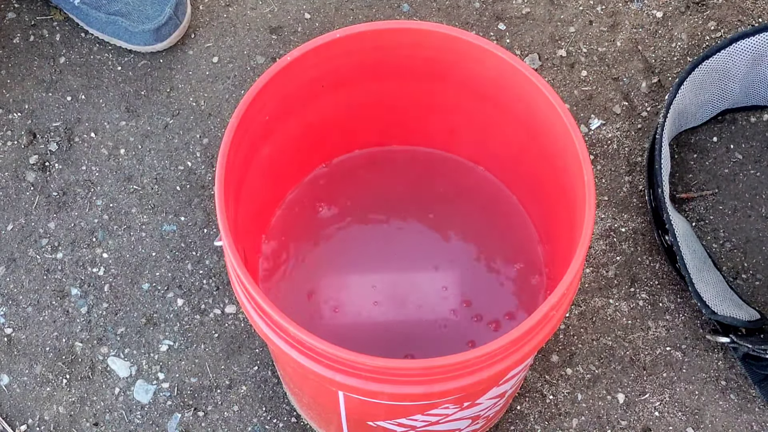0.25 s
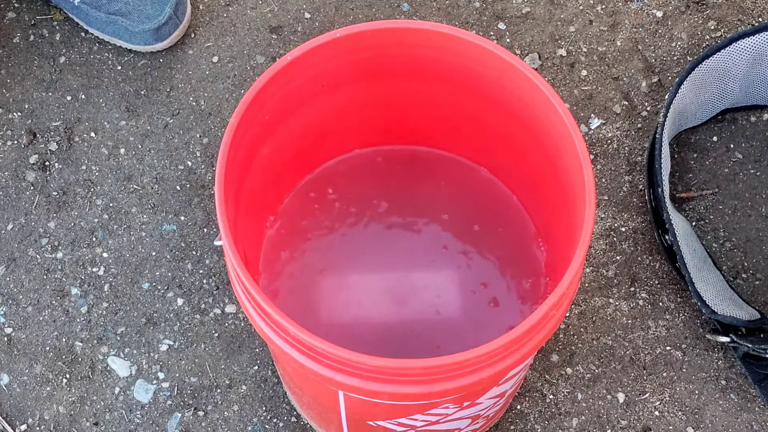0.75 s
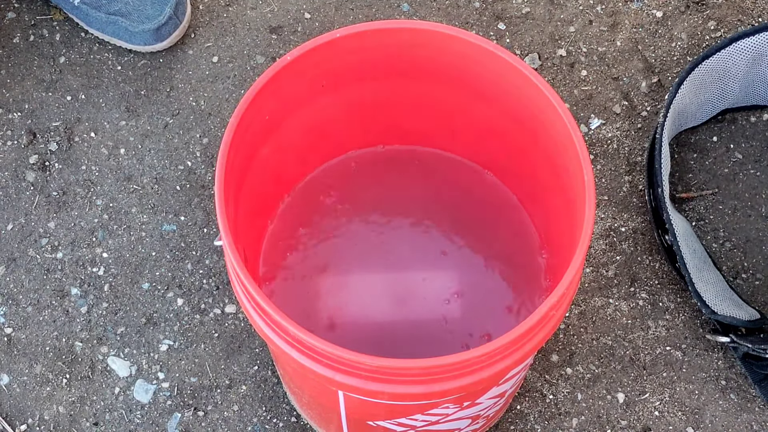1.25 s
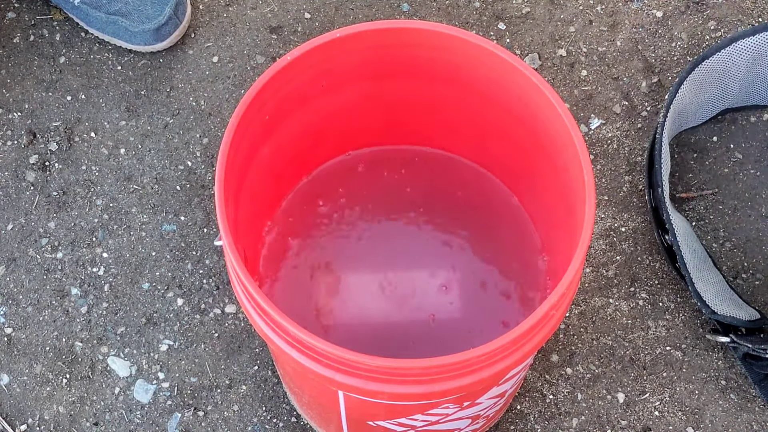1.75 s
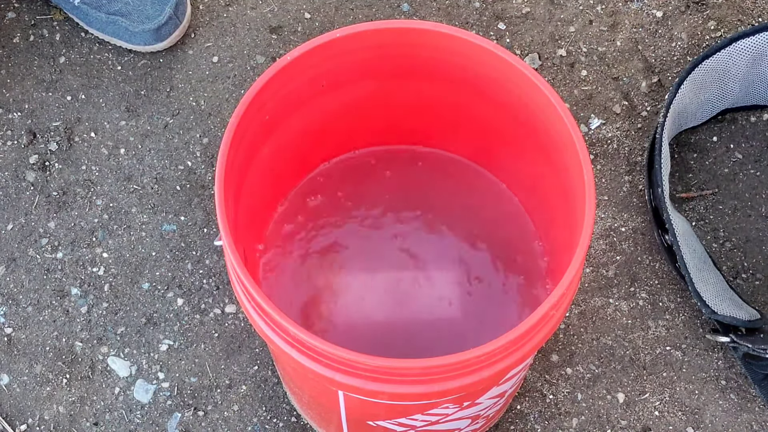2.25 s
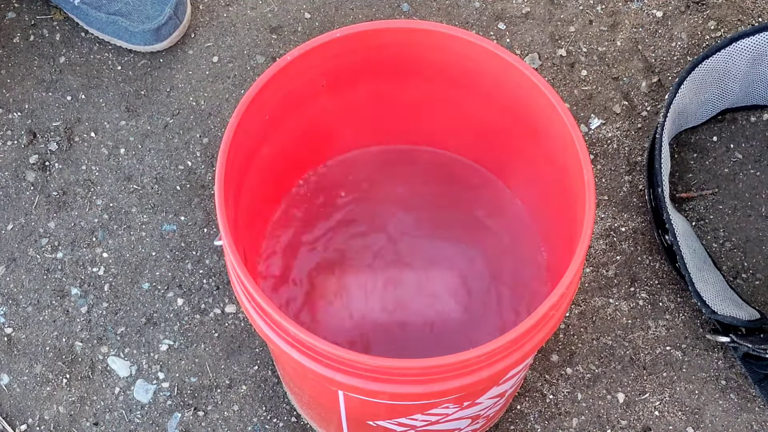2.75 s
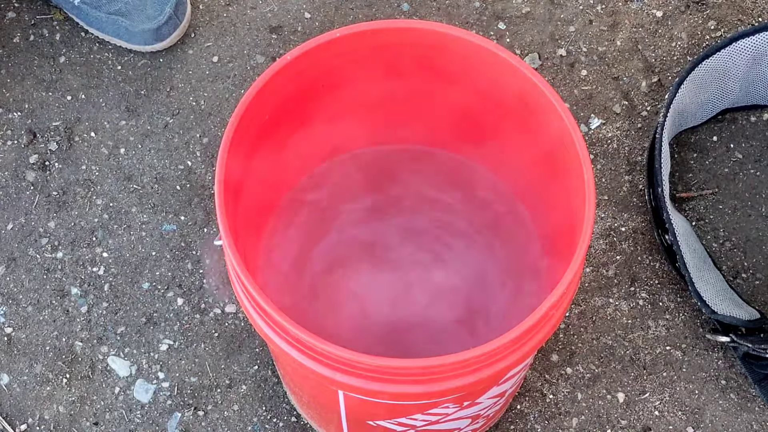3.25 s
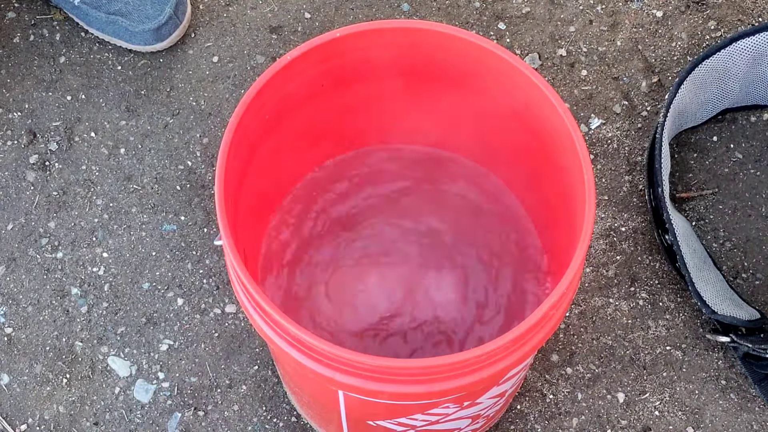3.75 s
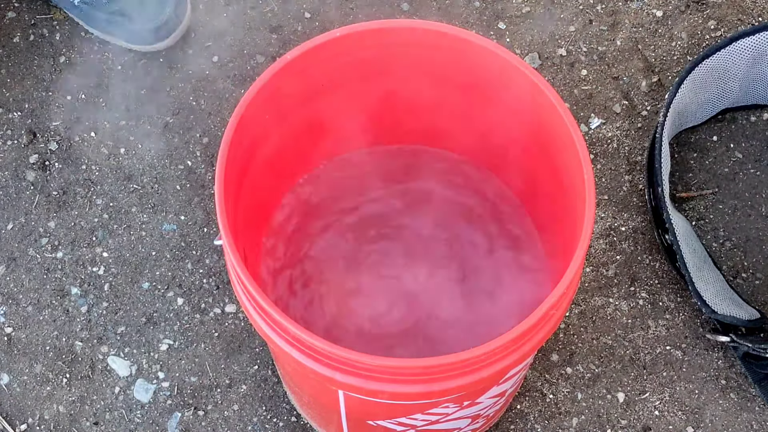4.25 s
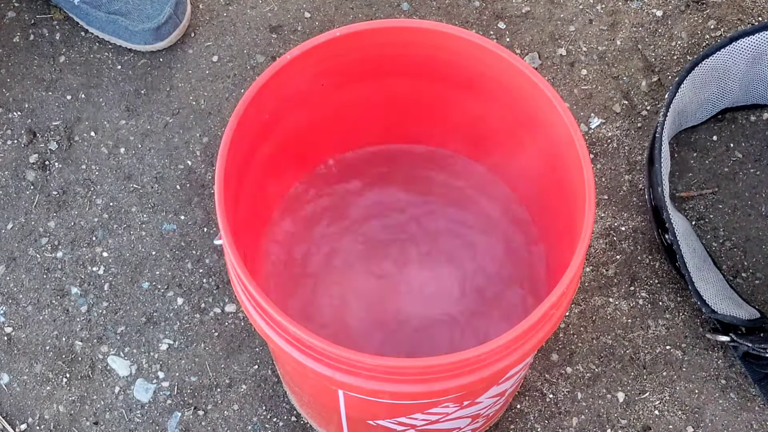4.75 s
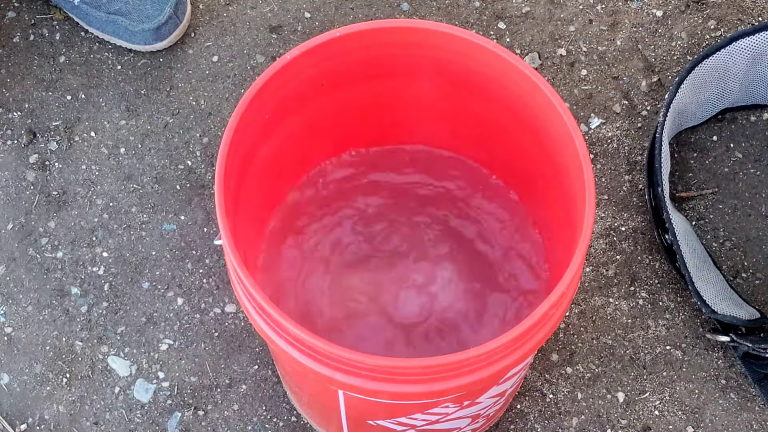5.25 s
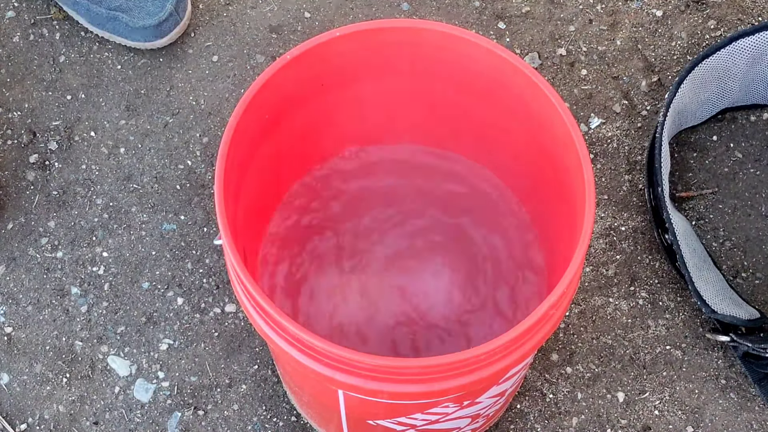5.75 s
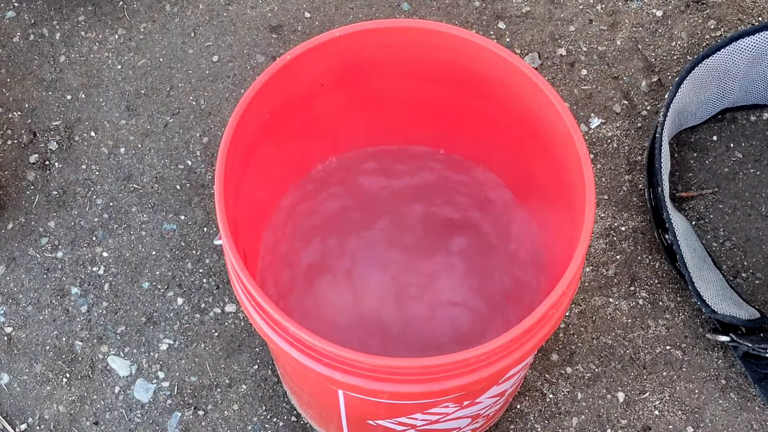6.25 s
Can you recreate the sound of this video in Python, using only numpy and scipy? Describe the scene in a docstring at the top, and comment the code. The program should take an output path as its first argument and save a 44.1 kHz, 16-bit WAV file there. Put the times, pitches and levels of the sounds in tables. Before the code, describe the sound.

Outdoors, very close over a plastic bucket with hot metal under water; a faint low rumble stays behind. From 0 s a thin, wavering, almost whistling hiss of fine bubbles sings around 2 kHz, with small gurgling surges and dull, hollow knocks, strong near 0.8, 1.1 and 1.4 s. From about 1.7 s larger ringing bubbles enter, and a flurry of tiny sharp high chirps ticks until 2.4 s. From 2 to 3.5 s the bubbling roar grows smoother and sinks in pitch while the singing fades away. Around 3.6 to 4 s the boil turns lumpy: ticks return, small bubbles crackle and snap, and heavy knocks crowd together, hardest around 4.7 s. Bright sizzle thickens through 5 to 5.9 s with more knocks. From about 6 s the boil drops into short separate gulps, with snaps and fine hiss continuing to the end at 6.5 s.

```python
"""Outdoors, a hot metal casting lies under water in a plastic bucket, heard in stereo from just above the rim.
First its vapour film sings and hisses with fine bubbles, and surges of steam pockets collapse in dull knocks.
Then larger ringing bubbles take over and sink in pitch as the song fades; sharp chirps tick at the metal.
Once the film has broken, knocks crowd together, small bubbles crackle and snap, and the ticks thicken to a hiss.
At the end the boil dies down to separate gulps; a faint outdoor rumble lies behind it all."""
import sys
import numpy as np
from scipy import signal
from scipy.fft import rfft, irfft
from scipy.io import wavfile
from scipy.ndimage import uniform_filter1d

SR = 44100
rng = np.random.default_rng(int(sys.argv[2]) if len(sys.argv) > 2 else 0)


def wrap_up_sound(samples):
    """Save the sound to the file named by the first command line argument, as 16-bit audio."""
    columns = np.atleast_2d(samples).T
    # keep every value between -1 and 1, then stretch to whole-number steps
    tamed = np.clip(columns, -1, 1)
    steps = np.round(tamed * 32767).astype(np.int16)
    wavfile.write(sys.argv[1], SR, steps)


N = 286650

# All table levels are relative: the trims of each source, the bucket and the mix gain come after them.
# Faint outdoor rumble. Each row: frequency in Hz, spectrum in dB.
AIR_COLOUR = [(20, -9), (60, -2.5), (150, -4.5), (300, 3), (600, -11), (1500, -16), (5000, -16),
              (16000, -44)]
# Air column in the bucket. Each row: frequency in Hz, width in Hz, gain in dB.
BUCKET_MODES = [(710, 16, -6), (945, 60, -12), (1390, 60, -15)]
# Peaks and dips the bucket gives to the treble. Each row: frequency in Hz, gain in dB.
WALL_COLOUR = [(4000, 3), (4500, 8), (4900, 4), (6250, 4.5), (6800, -4), (8000, -2.5), (8500, -2),
               (9150, -1), (9600, 1), (10050, -1), (10400, 3.5), (12100, -0.5), (13000, 5), (13900, 0),
               (14500, 6), (15100, 5), (15650, 1.5)]

# Fine bubbles leaving the vapour film. Each row: time in seconds, level in dB.
SIMMER_LEVEL = [(0, -47), (0.8, -47), (1.5, -47.5), (2.0, -48), (2.65, -46), (3.0, -49.5), (3.45, -48.5),
                (3.8, -58)]
# Spectrum of the fine bubbles. Each row: frequency in Hz, spectrum in dB.
SIMMER_COLOUR = [(900, -24), (1400, -21), (1800, -7), (2100, -9), (2380, -7), (2570, -9), (2820, -4),
                 (3150, -15), (3750, -19.5), (4050, -16), (4250, -21.5), (4480, -17), (5000, -34),
                 (7000, -61)]
# Singing of the film. Each row: time in seconds, strength of its ring in dB against the bubbles.
SONG_LEVEL = [(0, 5), (1.4, 3.5), (2.0, 0), (2.6, -1), (3.1, -7), (3.8, -29)]
# Narrow bands of hiss from the film. Each row: frequency in Hz, width in Hz, level in dB against the simmer.
FILM_BANDS = [(5660, 1400, -34.5), (11400, 1100, -29), (13450, 1000, -33.5)]

# Larger bubbles. Each row: time in seconds, level in dB.
BOIL_LEVEL = [(1.2, -59), (1.5, -58), (1.66, -48.5), (1.95, -51), (2.15, -45.5), (3.3, -43.5),
              (3.75, -47.5), (4.0, -44), (4.5, -44), (4.8, -46.5), (5.3, -46), (5.37, -55.5), (5.52, -48),
              (5.88, -46.5), (5.96, -50.5), (6.19, -63), (6.36, -55.5), (6.5, -58)]
# Their range of pitch. Each row: time in seconds, largest bubbles in Hz, smallest bubbles in Hz.
BOIL_PITCH = [(1.5, 1420, 2010), (1.8, 1200, 2010), (2.2, 1114, 2070), (2.7, 907, 1880), (3.4, 936, 1670),
              (4.1, 834, 1480), (5.4, 864, 1530), (6.5, 832, 1490)]
# A smoother roar turns lumpy once the film has broken. Each row: time in seconds, unevenness in dB.
BOIL_UNEVEN = [(1.5, 3.5), (3.3, 2), (4.5, 4)]
# Separate gulps as the boil dies down. Each row: start in seconds, length in seconds, level in dB.
GULPS = [(5.98, 0.069, -49), (6.068, 0.015, -46.5), (6.103, 0.036, -44), (6.212, 0.039, -51),
         (6.31, 0.025, -46.5), (6.378, 0.027, -44), (6.414, 0.015, -43)]
# Large bubbles popping in the boil. Each row: time in seconds, peak in dB, pitch in Hz.
POPS = [(2.114, -34, 1780), (2.609, -35, 1740), (3.427, -29.5, 1640), (3.774, -35, 1460), (6.466, -43, 880)]

# Small bubbles bursting once the film has broken. Each row: time in seconds, level in dB.
CRACKLE_LEVEL = [(3.6, -53.5), (4.7, -55.5), (5.4, -57.5), (6.05, -60.5), (6.2, -66.5), (6.39, -50.5),
                 (6.5, -61.5)]
# Bubbles snapping at the surface. Each row: time in seconds, peak in dB.
SNAPS = [(4.0931, -42), (4.185, -44), (4.243, -45), (4.2884, -37), (4.3442, -36), (4.6224, -43),
         (4.6688, -39), (4.9416, -42), (5.1134, -34), (5.1842, -42.5), (5.5263, -36), (5.6081, -38),
         (5.689, -50), (5.8094, -42.5), (6.0125, -42.5), (6.0432, -43), (6.079, -51), (6.2402, -48),
         (6.258, -44.5), (6.333, -48), (6.3812, -38), (6.413, -48), (6.43, -50), (6.4683, -41)]
# Spectrum of the crackle and snaps. Each row: frequency in Hz, spectrum in dB.
CRACKLE_COLOUR = [(1200, -3.5), (2100, -21), (2350, 8.5), (2650, 8), (2900, 8), (3400, 2.5), (4100, -4.5),
                  (4500, -7), (5100, -36), (8000, -52)]

# Tiny collapses at the metal. Each row: time in seconds, level in dB.
SIZZLE_LEVEL = [(0, -75.5), (0.7, -79), (1.55, -69.5), (1.78, -64), (1.86, -61), (2.15, -57.5), (2.45, -56),
                (2.95, -62.5), (3.6, -57), (4.1, -53), (4.7, -51.5), (5.05, -48.5), (5.45, -50.5),
                (5.55, -46), (6.15, -50.5), (6.3, -55.5), (6.5, -53)]
# Their kind. Each row: time in seconds, collapses per second of each kind, coarse ones in dB and
# finest ones in dB, both against the medium ones.
SIZZLE_KIND = [(0, 570, -11.5, -5), (1.5, 520, -20, 5), (1.9, 230, -2, 8), (2.4, 232, 1, 7),
               (3.1, 520, 0.5, -2), (3.7, 347, -7, -5), (4.2, 217, 1, -7), (4.8, 260, -4, -7.5),
               (5.3, 328, -11, -4), (5.8, 424, -11.5, -0.5), (6.5, 570, -16, -3)]
# Sharp ticks at the metal. Each row: time of the peak in seconds, peak in dB, pitch at the peak in Hz.
TICKS = [(1.7105, -38.5, 10000), (1.8314, -41, 12000), (1.849, -43, 13000), (1.858, -44, 11500),
         (1.878, -44, 12400), (1.9049, -41, 11800), (1.936, -40, 11300), (1.9442, -37.5, 12400),
         (2.0162, -36, 11650), (2.0382, -48, 12400), (2.0666, -40, 11200), (2.0859, -43, 13100),
         (2.1135, -37, 12000), (2.1201, -41, 12700), (2.1565, -32, 10700), (2.1908, -38.5, 12100),
         (2.2317, -45, 12400), (2.3102, -39, 12400), (2.3305, -41, 11100), (2.381, -46, 11400),
         (2.405, -42.5, 10500), (2.449, -41.5, 6500), (3.216, -41.5, 11200), (3.4247, -38, 9900),
         (3.4502, -38.5, 10300), (3.5722, -42, 11100), (3.6597, -39, 10900), (3.852, -40, 10100),
         (3.861, -36, 10200), (3.888, -37.5, 8720), (3.9633, -34.5, 10600), (3.9912, -39.5, 9100),
         (4.0251, -40, 10300), (4.0399, -33.5, 9700), (4.0676, -37, 8400), (4.089, -32, 9100),
         (4.0988, -36.5, 8620), (4.1218, -36, 11800), (4.1737, -41, 11900), (4.2151, -44, 10800),
         (4.2261, -35.5, 9060), (4.2387, -34, 9200), (4.3, -36, 11100), (4.3435, -43, 8400),
         (4.3578, -38.5, 8800), (4.4235, -38, 9500), (4.526, -34.5, 9500), (4.5616, -37, 10000),
         (4.6945, -33, 9970), (4.7764, -38, 9800), (4.7959, -29, 9700), (4.8076, -33, 9100),
         (4.835, -37, 7700), (4.8447, -33, 7400), (4.8592, -38, 9400), (4.8913, -36, 9700),
         (4.9394, -37, 7140), (4.9924, -34, 8800), (5.0745, -29, 10200), (5.1029, -38, 10500),
         (5.171, -33, 9680), (5.2592, -35, 11600), (5.3171, -38.5, 11700), (5.488, -35, 9800),
         (5.4943, -31, 11000), (5.5244, -35.5, 11400), (5.5572, -40, 12600), (5.6099, -35, 10600),
         (5.6895, -37, 10200), (5.696, -32, 11000), (5.8483, -33.5, 10100), (5.9214, -34, 11600),
         (5.958, -36.5, 11800), (6.0127, -35, 10500), (6.2019, -44, 11960)]
# Spectrum of the coarse collapses. Each row: frequency in Hz, spectrum in dB.
COARSE_COLOUR = [(2800, -18), (4300, -2.5), (5100, -5), (6000, -2.5), (8200, 3), (9500, -6), (12000, -3),
                 (16000, -15)]
# Spectrum of the medium collapses. Each row: frequency in Hz, spectrum in dB.
MEDIUM_COLOUR = [(5200, -43), (7000, 0.5), (9000, -4), (10800, -0.5), (11700, 2.5), (12700, -14),
                 (16000, -6)]
# Spectrum of the finest collapses. Each row: frequency in Hz, spectrum in dB.
FINE_COLOUR = [(6000, -47), (9300, -9), (11000, -7.5), (12900, -3.5), (14000, -5.5), (16000, -13)]

# Light churning between the surges. Each row: time in seconds, level in dB.
CHURN_LEVEL = [(0, -74.5), (1.8, -76), (2.5, -72), (3.2, -63), (4.8, -65), (6.5, -63)]
# The film heaves and sheds a run of steam pockets. Each row: start in seconds, length in seconds, level in dB.
SURGES = [(0.171, 0.025, -52), (0.231, 0.021, -47), (0.311, 0.013, -50.5), (0.364, 0.038, -54.5),
          (0.469, 0.012, -53.5), (0.525, 0.013, -51.5), (0.679, 0.014, -42), (0.764, 0.02, -41),
          (0.886, 0.099, -53), (1.081, 0.023, -38.5), (1.211, 0.026, -45.5), (1.304, 0.06, -41.5),
          (1.395, 0.049, -44), (1.472, 0.023, -41.5), (2.223, 0.028, -54.5), (3.26, 0.072, -50.5),
          (3.978, 0.11, -41.5), (4.135, 0.054, -48), (4.25, 0.17, -44), (4.551, 0.084, -39.5),
          (4.666, 0.17, -38.5), (4.791, 0.067, -36.5), (4.87, 0.26, -44.5), (5.152, 0.13, -51),
          (5.488, 0.069, -46), (5.659, 0.045, -44.5), (5.74, 0.145, -48.5)]
# Big steam pockets collapsing. Each row: time in seconds, peak in dB.
KNOCKS = [(0.239, -37), (0.686, -34), (0.742, -35), (0.771, -28), (0.789, -19), (1.089, -23), (1.098, -26),
          (1.336, -25.5), (1.358, -30.5), (1.404, -31), (1.439, -22.5), (1.47, -26.5), (1.522, -28),
          (3.025, -34), (3.179, -33), (3.263, -33.5), (3.971, -30.5), (4.059, -23.5), (4.373, -25.5),
          (4.467, -39), (4.612, -23.5), (4.682, -24), (4.691, -18.5), (4.702, -19), (4.812, -24.5),
          (4.835, -21.5), (5.022, -23), (5.033, -32), (5.531, -27), (5.573, -23.5), (5.605, -31),
          (5.744, -32.5), (5.847, -31), (5.907, -27), (5.912, -30)]
# Spectrum of a collapsing pocket. Each row: frequency in Hz, spectrum in dB.
POCKET_COLOUR = [(30, -16.5), (120, -17), (220, -16.5), (340, -5), (500, 3), (740, 4), (1000, -0.5),
                 (1500, -8), (2000, -16), (3000, -21), (4500, -35), (7000, -95)]

# surges and gulps swell and die away at these rates
SURGE_ATTACK_S, SURGE_RELEASE_DB_PER_S = 0.0088, 439
# delay from the listed time: knocks and pops, then snaps
KNOCK_DELAY_S, SNAP_DELAY_S = 0.002975, 0.00073
# a knock or snap sets off a clump of smaller bursts: how far below its peak it starts, how fast it dies
KNOCK_CLUMP_BELOW_DB, KNOCK_CLUMP_DECAY_S = 16.5, 0.02
SNAP_CLUMP_BELOW_DB, SNAP_CLUMP_DECAY_S = 11.5, 0.016
CUTOFF_HZ = 15800


def from_db(db):
    """Decibels to gain."""
    return 10 ** (np.asarray(db) / 20)


def in_time(rows):
    """Each column of a curve at every sample."""
    s, *columns = np.transpose(rows)
    return [np.interp(np.arange(N) / SR, s, c) for c in columns]


def faded(rows, fade_db_per_s=150):
    """Gain from a level curve, dying away outside its span."""
    t = np.arange(N) / SR
    outside_s = np.maximum(rows[0][0] - t, 0) + np.maximum(t - rows[-1][0], 0)
    return from_db(in_time(rows)[0] - fade_db_per_s * outside_s)


def even(x, window_s=0.77):
    """Hold the running rms of the centre of a stereo sound near 1; a small floor spares the silences."""
    power = uniform_filter1d(x.mean(0) ** 2, max(int(window_s * SR), 8))
    power = uniform_filter1d(power, max(int(window_s * SR / 2), 8))
    return x / np.sqrt(np.maximum(power, 0) + 1e-4 * power.mean())


def drift(rate_hz):
    """Slow chance of spread 1: noise smoothed by two equal poles, drawn at every 40th sample."""
    r = np.exp(-80 * np.pi * rate_hz / SR)
    noise = rng.standard_normal(N // 40 + 2002)
    slow = signal.lfilter([1], [1, -2 * r, r * r], noise)[2000:]
    return np.interp(np.arange(N) / 40, np.arange(len(slow)), slow / slow.std())


def response(colour, size=2048):
    """The causal (minimum-phase) ring that has this spectrum; peak 1."""
    hz, db = np.transpose(colour)
    log_bins = np.log(np.fft.rfftfreq(size, 1 / SR) + 1)
    log_gain = np.log(from_db(np.interp(log_bins, np.log(hz), db)))
    # folding the cepstrum forward in time makes the ring causal
    cepstrum = irfft(log_gain)
    cepstrum[1:size // 2] *= 2
    cepstrum[size // 2 + 1:] = 0
    ring = irfft(np.exp(rfft(cepstrum)))
    return ring / np.abs(ring).max()


def through(x, ring):
    """Pass stereo sound through an impulse response."""
    return signal.oaconvolve(x, np.atleast_2d(ring), axes=1)[:, :N]


def resonate(x, hz, width_hz):
    """A resonance with gain 1 on top."""
    r = np.exp(-np.pi * width_hz / SR)
    top = np.array([1, 0, -1]) * (1 - r * r) / 2
    return signal.lfilter(top, [1, -2 * r * np.cos(2 * np.pi * hz / SR), r * r], x + 1e-18)


def stereo(mid, side):
    """Left and right from centre and difference."""
    return np.array([mid + side, mid - side])


def grains(per_s, spread_db, largest=4.7):
    """Random clicks of either sign, many small and few large."""
    sizes = from_db(spread_db * np.minimum(rng.exponential(1, N), largest)) * rng.choice([-1, 1], N)
    return sizes * (rng.random(N) < per_s / SR)


def strikes(events, delay_s=0):
    """One click for each row of an event table."""
    s, db = np.transpose(events)[:2]
    clicks = np.zeros(N)
    clicks[np.round((s + delay_s) * SR).astype(int)] = from_db(db)
    return clicks


def bursts(clicks, decay_s, width):
    """Each click is followed by its own brief scatter of reflections off the bucket wall."""
    r = np.exp(-2 / (decay_s * SR))
    envelope = np.sqrt(signal.lfilter([1 - r], [1, -r], clicks ** 2 + 1e-18))
    mid, side = rng.standard_normal((2, N))
    return envelope * stereo(mid, width * side)


def pings(s, gain, hz, ring_s, sag, width, echo_s, echo_db=-5, taper=1, count=4):
    """Each bubble swells, rings briefly and may bend in pitch; weaker copies come back off the bucket wall."""
    # age is 1 at the peak of the swell, where the pitch is hz; positive sag falls, negative rises
    age = np.arange(int(9 / taper * ring_s * SR)) / (ring_s * SR)
    phase = 2 * np.pi * hz[:, None] * np.cumsum(np.exp(sag * (1 - age))) / SR
    shape = gain[:, None] * (age * np.exp(1 - age)) ** taper
    sine, cosine = shape * np.sin(phase), shape * np.cos(phase)
    chance = rng.standard_normal((len(s), count, 2))
    out = np.zeros((2, N))
    for k in range(count):
        late_s = k * echo_s * np.exp(chance[:, k, 0] / 2)
        turn = width * chance[:, k, 1:]  # phase between the ears places each copy
        at = ((s + late_s) * SR).astype(int)[:, None] + np.arange(len(age))
        mid = np.bincount(at.ravel(), (sine * np.cos(turn)).ravel(), N)[:N]
        side = np.bincount(at.ravel(), (cosine * np.sin(turn)).ravel(), N)[:N]
        out += from_db(k * echo_db) * stereo(mid, side)
    return out


def swells(rows):
    """Power of a run of surges: each swells quickly, holds and dies away."""
    t, power = np.arange(N) / SR, 0
    for start, length, db in rows:
        attack = np.clip((t - start) / SURGE_ATTACK_S, 0, 1)
        release_db = SURGE_RELEASE_DB_PER_S * np.maximum(t - start - length, 0)
        power = power + (attack * from_db(db - np.minimum(release_db, 120))) ** 2
    return power


def clumps(events, below_db, decay_s):
    """Power of the smaller bursts that flare up after each event and settle again."""
    r = np.exp(-2 / (decay_s * SR))
    return signal.lfilter([1], [1, -r], (strikes(events) * from_db(-below_db)) ** 2 + 1e-18)


def surging():
    """Gain of the churning: a light bed, the surges, and a brief stir after each knock."""
    stir = clumps(KNOCKS, KNOCK_CLUMP_BELOW_DB, KNOCK_CLUMP_DECAY_S)
    return np.sqrt(faded(CHURN_LEVEL) ** 2 + swells(SURGES) + stir)


def open_air(level_db=-74.0):
    """A faint outdoor rumble: shaped noise, different at each ear."""
    air = through(rng.standard_normal((2, N)), response(AIR_COLOUR))
    return from_db(level_db) * air / air.std()


def film_hiss(flutter_db=5.0):
    """The finest bubbles of the film hiss in a few narrow bands that flutter on their own."""
    out = 0
    for hz, width_hz, db in FILM_BANDS:
        clicks = grains(900, spread_db=-4.0) * from_db(flutter_db * drift(15))
        fizz = bursts(clicks, decay_s=0.0016, width=0.92)
        out = out + from_db(db) * even(resonate(resonate(fizz, hz, width_hz), hz, width_hz))
    return out * faded(SIMMER_LEVEL)


def simmer(flutter_db=2.0, width=0.16, sing_hz=2280, sing_width_hz=140, waver=0.012,
           puff_hz=1780, puff_width_hz=450, puff_db=-9.0, puff_flutter_db=6.0):
    """Dense fine bubbles shed in quick surges, with puffs of larger ones; the whole film rings and wavers."""
    surge, n = from_db(flutter_db * drift(19)), np.arange(N)
    ring = response(SIMMER_COLOUR)

    def stream():
        """A fresh run of bubbles in the shared surges."""
        clicks = grains(1700, spread_db=0.0) * surge
        return through(stereo(clicks, width * clicks * rng.standard_normal(N)), ring)

    # reading the ring with an uneven clock wavers its pitch
    clock = n + np.cumsum(waver * drift(24.5))
    song = np.array([np.interp(clock, n, ear) for ear in resonate(stream(), sing_hz, sing_width_hz)])
    song = even(song) * from_db(in_time(SONG_LEVEL)[0])
    puffs = resonate(resonate(stream(), puff_hz, puff_width_hz), puff_hz, puff_width_hz)
    puffs = even(puffs) * from_db(puff_db + puff_flutter_db * drift(25))
    return even(even(stream()) + song + puffs) * faded(SIMMER_LEVEL)


def boil(level_db=0.1, edge_db_per_octave=46, tilt_db_per_octave=-3.0, lowest_hz=480, muffle_hz=3100,
         wide_below_hz=560, count=36, sharpness=11):
    """Each bubble rings at its own pitch, muffled by water; as the metal cools they grow and the band sinks."""
    low, high = np.log2(in_time(BOIL_PITCH))
    clicks = grains(3400, spread_db=3.0) * from_db(in_time(BOIL_UNEVEN)[0] * drift(54))
    at = np.flatnonzero(clicks)
    # every bubble is dealt one of the pitches and a place between the ears
    dealt, place = rng.integers(0, count, N)[at], rng.standard_normal(N)[at]
    out = np.zeros((2, N))
    for k, hz in enumerate(np.geomspace(550, 2700, count)):
        mine, octave = at[dealt == k], np.log2(hz)
        outside = np.maximum(low[mine] - octave, 0) + np.maximum(octave - high[mine], 0)
        tilt_db = tilt_db_per_octave * np.log2(hz / 1000)
        sizes = clicks[mine] * from_db(tilt_db - edge_db_per_octave * outside)
        sides = sizes * place[dealt == k] / np.sqrt(1 + (hz / wide_below_hz) ** 4)
        born = np.zeros((2, N))
        born[:, mine] = stereo(sizes, sides)
        out += resonate(born, hz, hz / sharpness)
    muffle = signal.butter(2, [lowest_hz, muffle_hz], "band", fs=SR, output="sos")
    out = even(signal.sosfilt(muffle, out), window_s=0.16)
    return out * np.sqrt(faded(BOIL_LEVEL) ** 2 + swells(GULPS)) * from_db(level_db)


def pops():
    """Single large bubbles stand out of the boil, each a short ring of steady pitch."""
    s, db, hz = np.transpose(POPS)
    return pings(s + KNOCK_DELAY_S, from_db(db), hz, ring_s=0.00047, sag=0, width=0.085, echo_s=0.0027)


def crackle(level_db=-2.0, crack_db=0.5, clump_db=3.0):
    """Small bubbles burst in clumps once the film has broken; a large one cracks and rings briefly."""
    ring = response(CRACKLE_COLOUR)
    clicks = grains(170, spread_db=3.0, largest=2.3) * from_db(clump_db * drift(27))
    bed = even(through(bursts(clicks, decay_s=0.0036, width=0.067), ring), window_s=0.19)
    cracks = through(bursts(strikes(SNAPS, SNAP_DELAY_S), decay_s=0.0028, width=0.14), ring)
    s, db = np.transpose(SNAPS)
    hz = rng.uniform(2300, 2800, len(s))
    rings = pings(s + SNAP_DELAY_S, from_db(db), hz, ring_s=0.00099, sag=0, width=0.15, echo_s=0.0036)
    stir = clumps(SNAPS, SNAP_CLUMP_BELOW_DB, SNAP_CLUMP_DECAY_S)
    busy = np.sqrt(faded(CRACKLE_LEVEL) ** 2 + stir)
    return bed * busy * from_db(level_db) + cracks * from_db(crack_db) + rings


def sizzle(level_db=-1.0, tick_db=4.5, patchy_db=2.1, hiss_db=-7.5, tick_ring_s=0.00039, tick_sag=0.23,
           ring_s=0.00028, sag=0.22, echo_s=0.0007, widths=(0.95, 0.57, 0.57)):
    """Tiny bubbles collapse against the metal, each a sharp chirp falling in pitch, over a bed of hiss."""
    per_s, coarse_db, fine_db = in_time(SIZZLE_KIND)
    shares = from_db([coarse_db, np.zeros(N), fine_db])
    shares /= np.sqrt(shares[0] ** 2 / 2 + shares[1] ** 2 + shares[2] ** 2)
    gains = shares * faded(SIZZLE_LEVEL) * from_db(level_db)
    bed = 0
    for colour, gain, width in zip((COARSE_COLOUR, MEDIUM_COLOUR, FINE_COLOUR), gains, widths):
        clicks = grains(per_s, spread_db=5.0, largest=2.55) * from_db(patchy_db * drift(9.4))
        at, ring = np.flatnonzero(clicks), response(colour)
        hz = rng.uniform(4500, 15500, N)[at]
        chirps = pings(at / SR, clicks[at], hz, ring_s, sag, width, echo_s, taper=2.2)
        fizz = even(through(chirps, ring), window_s=0.32)
        mid, side = rng.standard_normal((2, N))
        hiss = even(through(stereo(mid, width * side), ring))
        bed = bed + gain * (fizz + from_db(hiss_db) * hiss)
    s, db, hz = np.transpose(TICKS)
    ticks = pings(s - tick_ring_s, from_db(db), hz, tick_ring_s, tick_sag, widths[1], echo_s, taper=1.8)
    wall = response(WALL_COLOUR)
    return through(bed + ticks * from_db(tick_db), wall / np.linalg.norm(wall))


def gurgle(level_db=-3.5, ring_s=0.0011, rise=0.011):
    """Single bubbles break loose with short blips that rise in pitch, loudest in the surges."""
    clicks = grains(120, spread_db=0.5, largest=2.4)
    at = np.flatnonzero(clicks)
    hz = np.exp(rng.uniform(np.log(520), np.log(1700), N))[at]
    blips = pings(at / SR, clicks[at], hz, ring_s, -rise, width=0.3, echo_s=0.003)
    return even(blips, window_s=0.075) * surging() * from_db(level_db)


def pockets(churn_db=-1.5, knock_db=-1.2, flutter_db=1.0, wide_below_hz=1900, sharp_db_per_octave=1.0,
            pitch_spread=0.054):
    """Steam pockets collapse as dull pulses, big ones sharper and each at its own pitch, bass to one side."""
    ring, bass = response(POCKET_COLOUR), signal.butter(2, wide_below_hz, fs=SR, output="sos")
    clicks = grains(280, spread_db=0.5, largest=2.4) * from_db(flutter_db * drift(45.0))
    side = signal.sosfiltfilt(bass, clicks * rng.choice([-1, 1], N) + 1e-18)
    churn = even(through(stereo(clicks, side), ring), window_s=0.062)
    hz, colour_db = np.transpose(POCKET_COLOUR)
    octaves_above_peak = np.maximum(np.log2(hz / hz[np.argmax(colour_db)]), 0)
    sharp_db = colour_db + sharp_db_per_octave * octaves_above_peak
    knocks = np.zeros((2, N))
    for s, db in KNOCKS:
        own_hz = hz * np.exp(pitch_spread * rng.standard_normal())
        pulse = from_db(db) * response(np.transpose([own_hz, sharp_db]))
        # silence ahead gives the two-way filter room
        padded = np.pad(pulse, (len(pulse), 0))
        pulse_bass = signal.sosfiltfilt(bass, padded)[len(pulse):]
        start = int((s + KNOCK_DELAY_S) * SR)
        knocks[:, start:start + len(pulse)] += stereo(pulse, rng.choice([-1, 1]) * pulse_bass)
    return churn * surging() * from_db(churn_db) + knocks * from_db(knock_db)


def bucket(x, tail_db=-17, decay_s=0.0056, size=4096):
    """The air column rings, and sound bounces briefly between the walls."""
    t = np.arange(size) / SR
    tail = rng.standard_normal(size) * np.exp(-t / decay_s) * (t > .002)
    column = sum(from_db(db) * resonate(x, hz, width_hz) for hz, width_hz, db in BUCKET_MODES)
    return x + column + from_db(tail_db) * through(x, tail / np.linalg.norm(tail))


def scene():
    """Everything in the water sounds through the bucket; the open air lies around it."""
    film = simmer() + film_hiss()
    bubbles = boil() + pops() + crackle() + sizzle()
    steam = gurgle() + pockets()
    return open_air() + from_db(-3.5) * bucket(film + bubbles + steam)


def record(dry):
    """The top is cut steeply at the microphone's end of the chain."""
    steep = signal.ellip(10, .2, 80, CUTOFF_HZ, fs=SR, output="sos")
    return signal.sosfilt(steep, dry)


dry = scene()
out = record(dry)
wrap_up_sound(out)
```